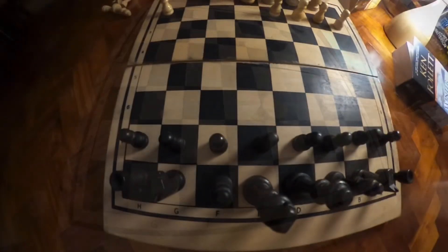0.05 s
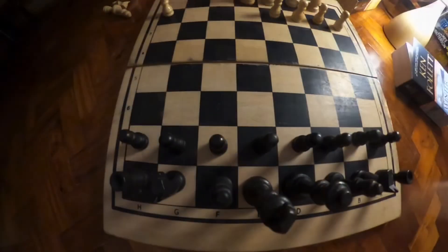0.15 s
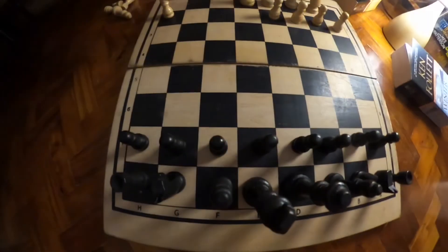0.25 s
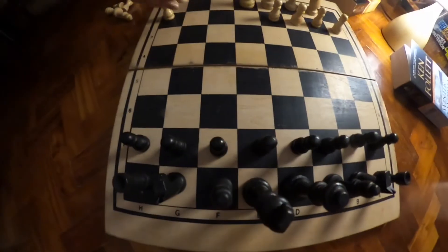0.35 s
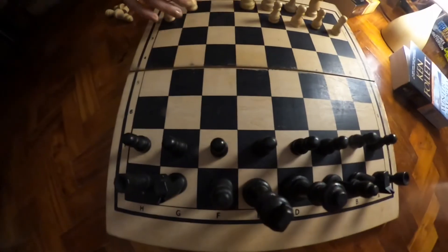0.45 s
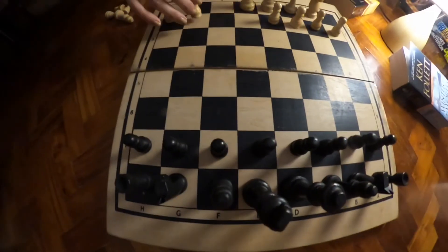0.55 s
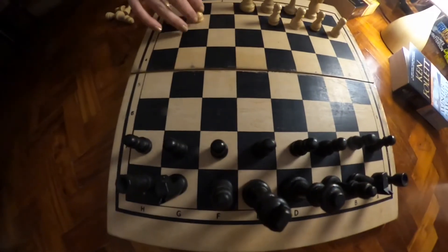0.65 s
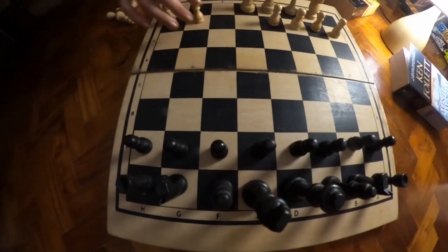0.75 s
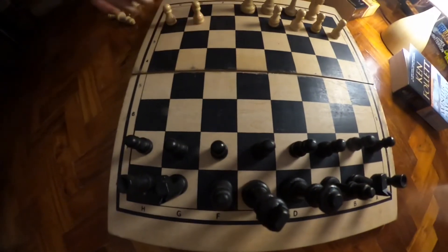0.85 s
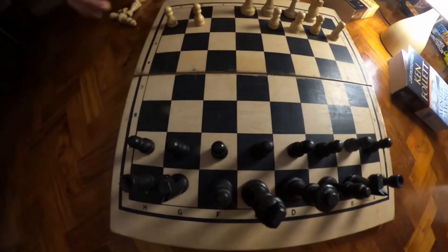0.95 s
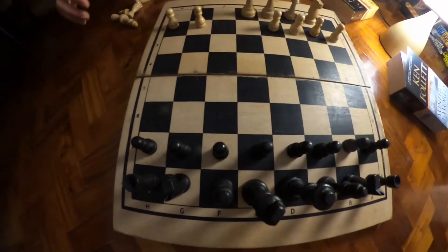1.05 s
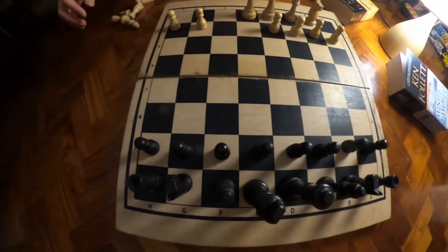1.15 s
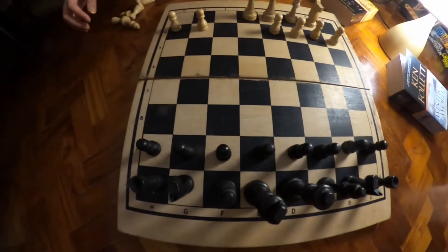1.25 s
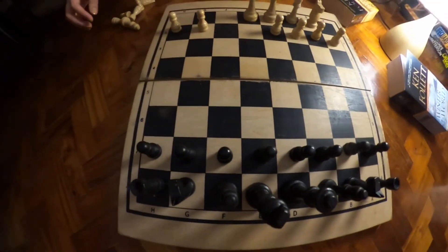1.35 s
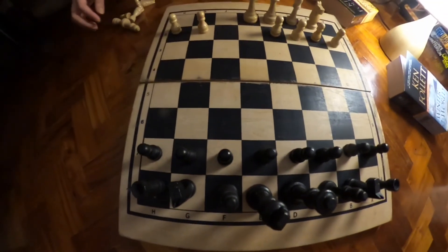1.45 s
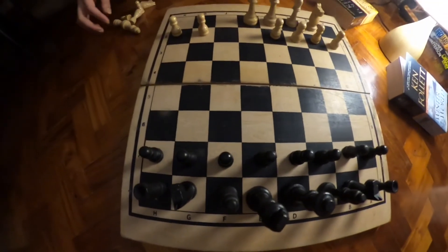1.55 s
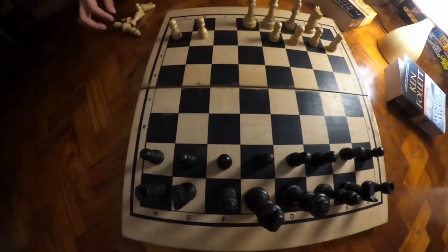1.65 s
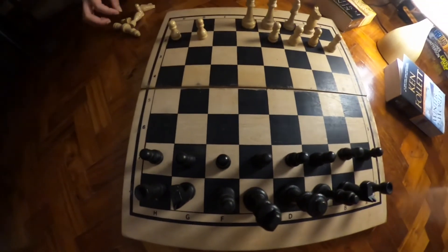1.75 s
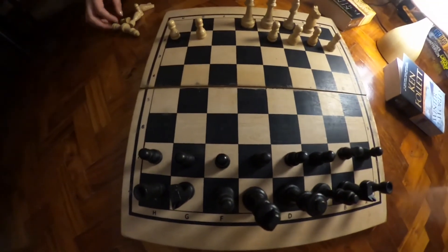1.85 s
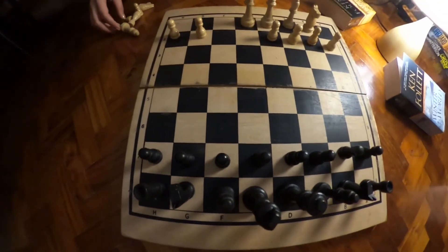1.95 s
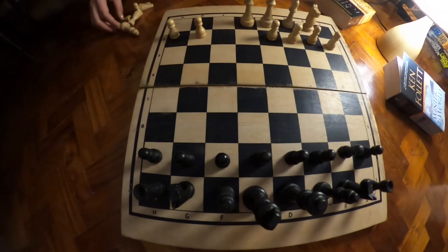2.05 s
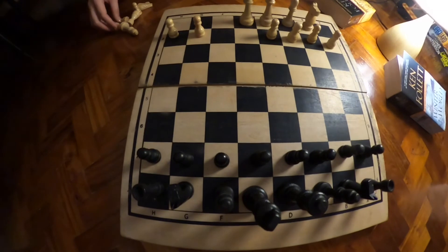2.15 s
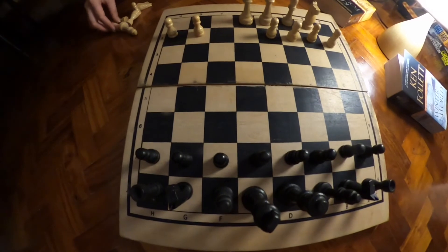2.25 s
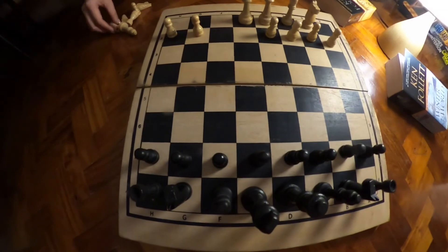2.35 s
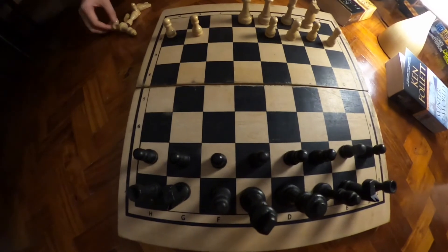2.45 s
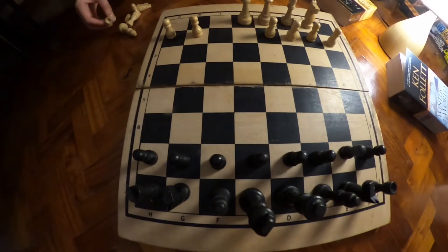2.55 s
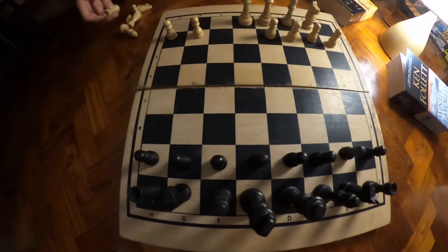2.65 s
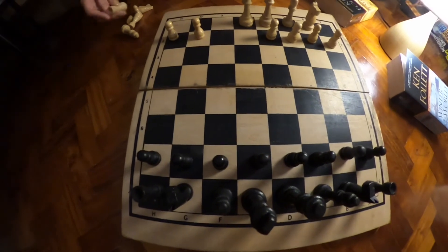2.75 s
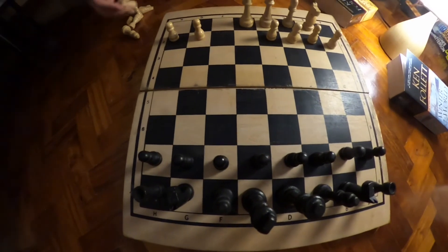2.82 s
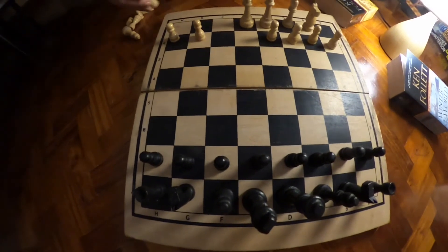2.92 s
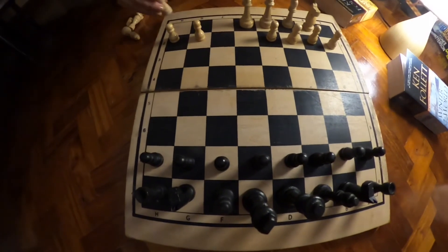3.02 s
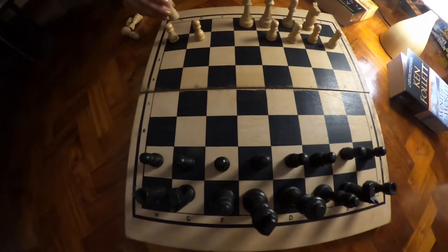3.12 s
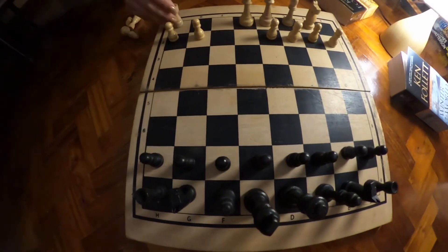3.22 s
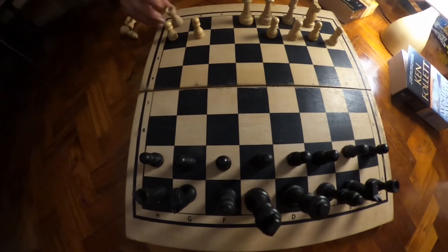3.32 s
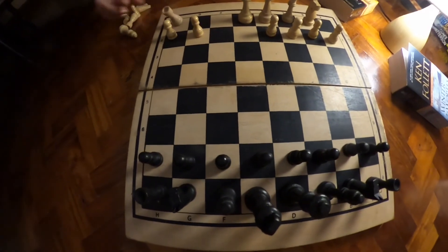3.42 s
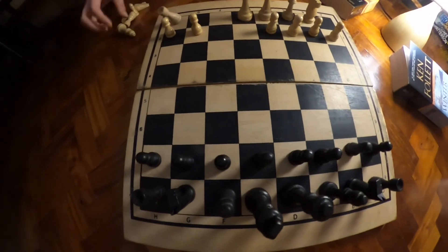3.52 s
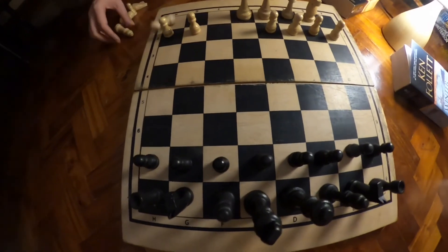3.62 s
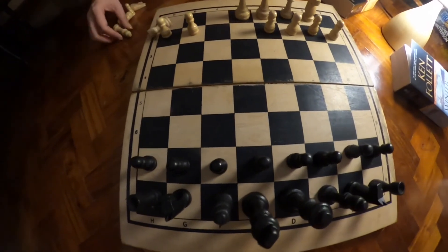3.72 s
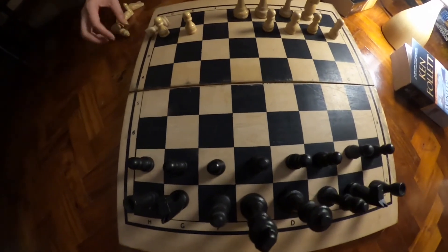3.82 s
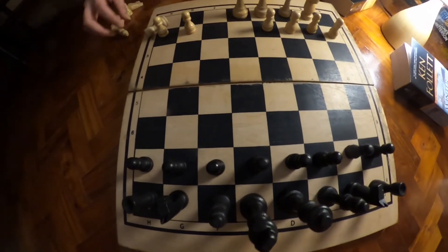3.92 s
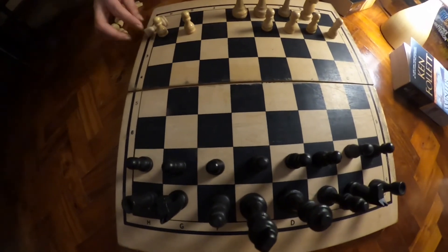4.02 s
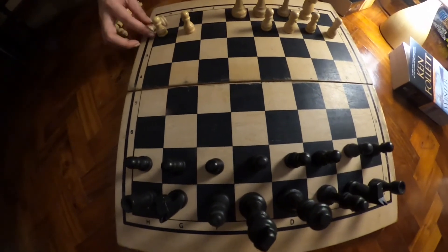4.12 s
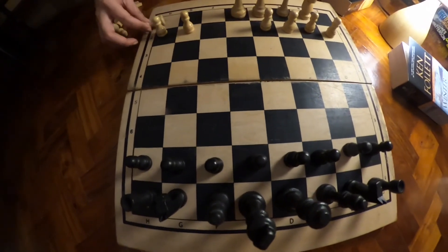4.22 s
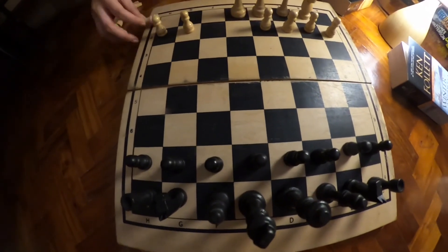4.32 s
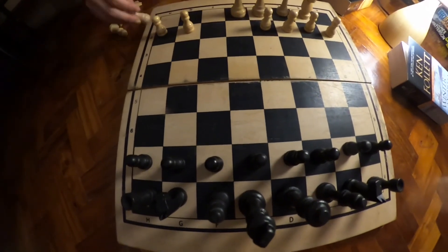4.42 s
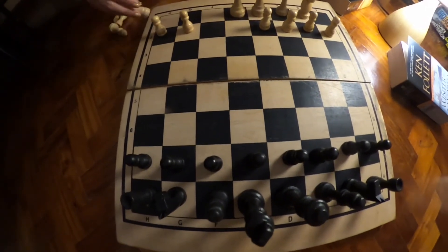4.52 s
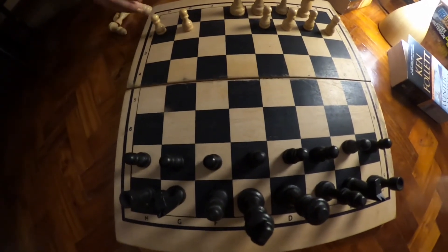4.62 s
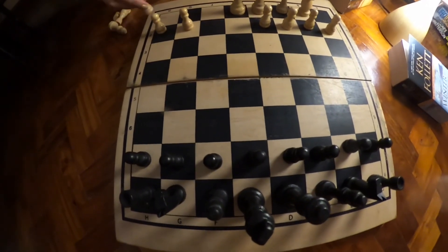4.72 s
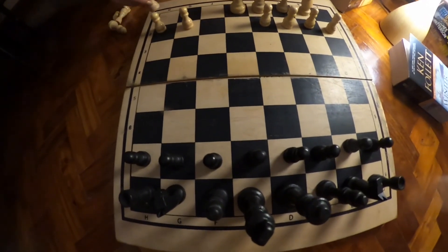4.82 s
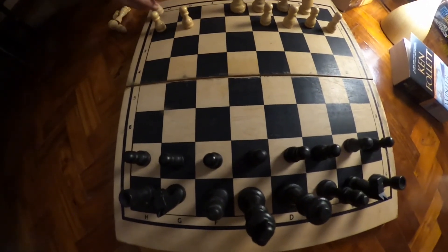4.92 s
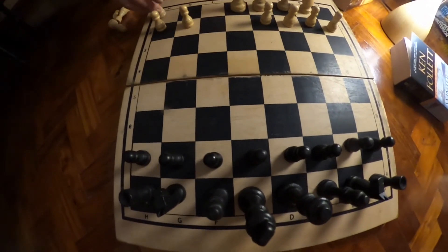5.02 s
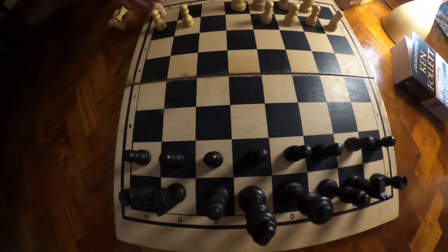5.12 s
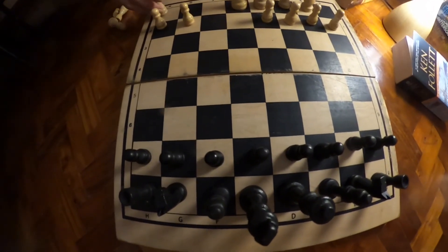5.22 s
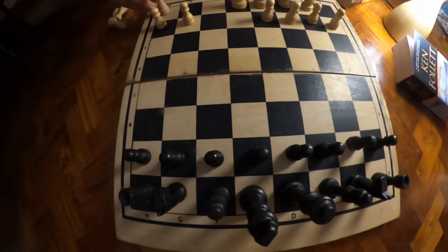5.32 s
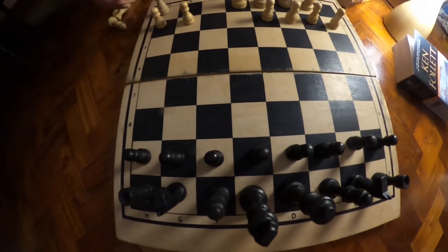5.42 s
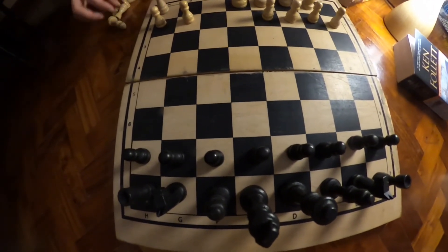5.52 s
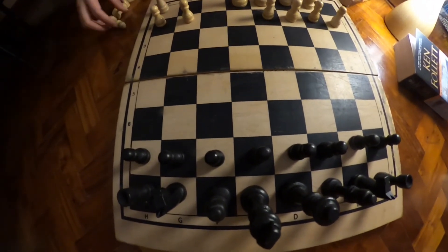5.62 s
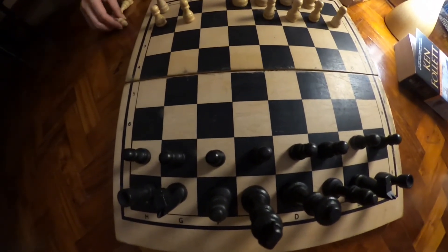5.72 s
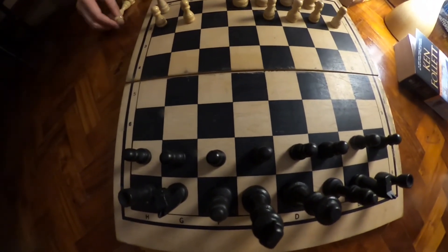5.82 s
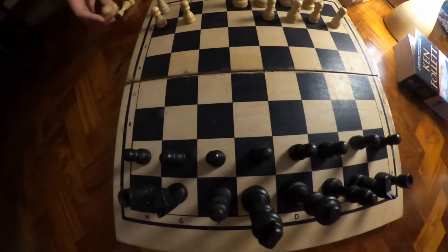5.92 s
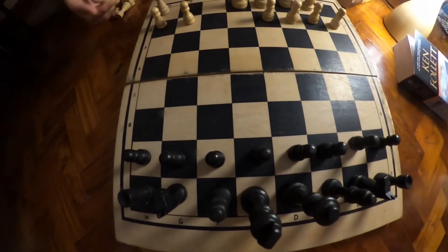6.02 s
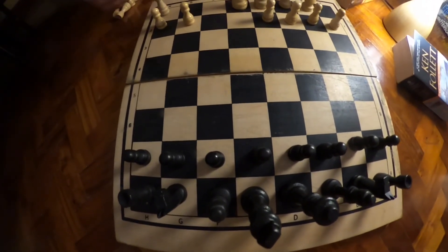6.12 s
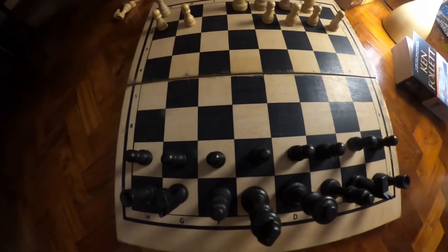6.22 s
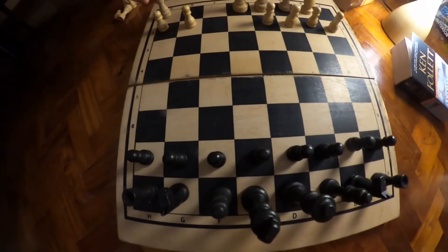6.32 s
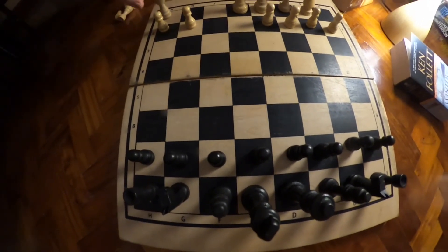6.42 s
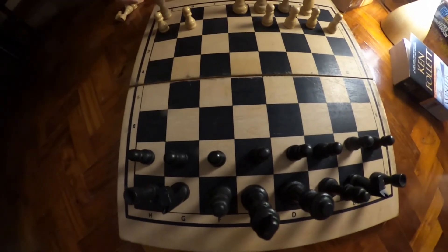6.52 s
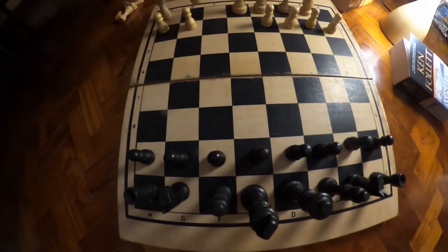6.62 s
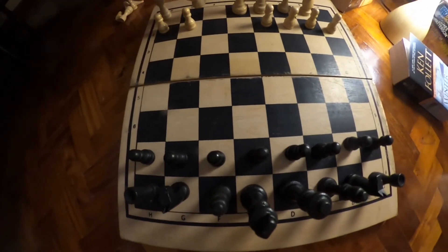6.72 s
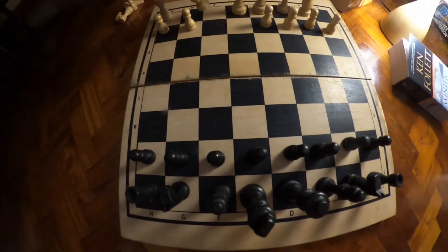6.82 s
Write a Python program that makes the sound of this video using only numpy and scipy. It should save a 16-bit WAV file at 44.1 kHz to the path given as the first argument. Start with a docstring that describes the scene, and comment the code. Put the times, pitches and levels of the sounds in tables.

```python
"""In a small room, microphone close: wooden chess pieces knock on a hollow folding board within the first second.
Fingers then rub spare pieces, which click in the hand; firmer knocks and a loud click follow from 3.2 s.
From 4.1 s pieces rock and slide into place, with more knocks and slides from 5 s; after 5.68 s one rattles to rest.
Wood sounds are taps, noise and damped modes with a diffuse echo; beneath them all lie wavering sine hum lines
and filtered noise, the drone of mains and fan."""
import sys
import numpy as np
from scipy import signal
from scipy.fft import rfft, irfft, next_fast_len
from scipy.io import wavfile

SR = 44100
rng = np.random.default_rng(int(sys.argv[2]) if len(sys.argv) > 2 else 0)


def log_audio(samples):
    """Write samples as a 16-bit WAV file to the path given in sys.argv[1]."""
    # one column per channel
    frames = np.atleast_2d(samples).T
    # limit to full scale, then quantise
    limited = np.clip(frames, -1, 1)
    pcm = np.round(limited * 32767).astype(np.int16)
    wavfile.write(sys.argv[1], SR, pcm)


N = 302526
TIME = np.arange(N) / SR
RING = TIME[:SR // 3]  # time axis of one strike, s


def undb(db):
    """Decibels to gain."""
    return 10 ** (np.asarray(db) / 20)


def unit(x):
    """Scale to rms 1."""
    return x / np.sqrt(np.mean(x ** 2))


def decay(t, t60):
    """Exponential decay that falls 60 dB in t60 seconds."""
    return np.exp(-np.log(1000) * t / t60)


def at(hz, points):
    """Read (Hz, value) points on a log-frequency axis."""
    f, value = np.transpose(points)
    return np.interp(np.log(hz + 1e-6), np.log(f), value)


def over_time(points):
    """Draw a line through (s, value) points over the whole scene."""
    return np.interp(TIME, *np.transpose(points))


def peak_at(f, centre_hz, octaves):
    """Resonance-shaped gain around a centre, at half its height the given octaves away."""
    return 1 / (1 + (np.log2((f + 1) / centre_hz) / octaves) ** 2)


def shape(x, gain):
    """Filter with a gain given as a function of Hz."""
    n = x.shape[-1]
    size = next_fast_len(n, real=True)
    spectrum = rfft(x, size) * gain(np.fft.rfftfreq(size, 1 / SR))
    return irfft(spectrum, size)[..., :n]


def butter(x, hz, kind, order=2):
    """Causal low- or high-pass."""
    return signal.sosfilt(signal.butter(order, hz, kind, fs=SR, output="sos"), x)


def add(track, s, sound):
    """Mix a sound into the track at a time."""
    start = int(s * SR)
    track[start:start + len(sound)] += sound[:N - start]


def swell(s, length, attack_s, release_s):
    """Envelope of a hand movement: it rises, holds until its length is over and dies away."""
    t = TIME - s
    return np.clip(t / attack_s, 0, 1) * np.exp(-np.maximum(t - length, 0) / release_s)


def wander(rate):
    """Smooth chance of spread 1 that changes about rate times a second."""
    return unit(shape(rng.standard_normal(N), lambda f: 1 / (1 + (f / rate) ** 4)))


def even_noise(n, size=512, count=3):
    """Noise with its lumps in time and pitch levelled out, like a dense, well-mixed ring."""
    noise = rng.standard_normal(n)
    for _ in range(count):
        cells = signal.stft(noise, nperseg=size)[2]
        noise = signal.istft(cells / (np.abs(cells) + 1e-12))[1][:n]
    return noise


def fading_noise(t, colour, decays):
    """Countless overlapping modes: coloured noise in which each band dies at its own rate."""
    noise = unit(shape(even_noise(len(t)), colour))
    out = 0
    for hz, t60 in decays:
        share = [(f, float(f == hz)) for f, _ in decays]  # crossfades into the neighbouring bands
        band = shape(noise, lambda f: at(f, share))
        out = out + band * decay(t, t60)
    return out


def ring(modes, weight, scatter_db, lag_rad=1.693):
    """Damped modes; each lags its lower neighbour, and every strike weights them a little differently."""
    hz, db, t60 = np.transpose(modes)
    size = undb(db + scatter_db * rng.standard_normal(len(hz))) * weight(hz)
    lag = lag_rad * np.arange(len(hz))[:, None]
    swing = np.sin(2 * np.pi * np.outer(hz, RING) - lag)
    return size @ (swing * decay(RING, t60[:, None]))


# pieces set down close to the microphone, rim first, then flat; columns: start_s, level_db of the rim contact,
# contact_hz (corner of the rim contact, high is hard), damping_db_per_s (by the pressing hand),
# thump_db (panel boost at the rim contact), pitch_hz (of the thump), rim_spot_hz and base_spot_hz
# (what each spot favours), tilt_s (time until it lies flat), flat_db (flat contact relative to the rim)
SET_DOWNS = [(0.5886, -19, 1420, 205, -3.5, 395.4, 430, 674, 0.0077, -4.5),
             (0.6192, -32, 1000, 192, 1, 405, 704, 1550, 0.0056, 4),
             (3.2130, -18.5, 2580, 113, -4.5, 367, 1300, 335, 0.0063, -6.5),
             (3.625, -20.5, 5160, 127.5, 0, 432.5, 1200, 2000, 0.021, -8.5),
             (3.6734, -24.5, 3400, 5, -5.5, 358, 1150, 620, 0.0048, -5.5),
             (3.6935, -31, 3400, 40, 0.5, 358, 1540, 2020, 0.0042, 0),
             (4.0871, -36.5, 800, 192, 0, 383, 390, 366, 0.00553, -8),
             (4.1155, -34.5, 1690, 93, -8, 390, 1190, 1200, .007, 2),
             (4.1427, -44, 7000, 118, 4, 390, 2100, 1200, 0.011, -16),
             (4.1711, -44.5, 1200, 127, 3, 369, 480, 390, 0.00724, 2.5),
             (4.238, -44.5, 2380, 99, -5, 390, 1200, 754, 0.00274, -4),
             (4.2673, -43.5, 3300, 180, 5, 390, 2100, 1150, 0.018, -2),
             (4.252, -50, 3000, 153, 8, 390, 800, 1150, .003, -8),
             (4.304, -50.5, 3000, 148, -5, 390, 1140, 1140, .008, 1),
             (4.324, -48, 4200, 117, -16, 400, 1140, 1160, .004, -8.5),
             (4.9850, -24.5, 2460, 271.5, -4, 350, 1180, 1245, .007, -4.5),
             (5.2375, -43.5, 1800, 198, -7, 390, 1340, 820, 0.0041, 2),
             (5.2523, -39.5, 1400, 142, -2, 380, 1200, 410, .0075, 1.5),
             (5.287, -54, 1300, 146, -3, 385, 1250, 1250, 0.0043, -5),
             (5.3164, -44, 1600, 197, 4.5, 365, 1270, 694, 0.0026, -7),
             (5.339, -39.5, 443, 149, 3.5, 331, 340, 337, 0.016, -6)]
RIM_SPOT_DB, BASE_SPOT_DB = 6, 13.5  # how strongly a spot favours its modes
FLAT_SOFTER, FLAT_THUMP_DB = 0.63, 0.5  # flat contact: factor on the corner, extra panel boost


def knocks(tap_db=19, crack_db=4, crack_s=0.0055):
    """Pieces land rim first and drop flat: each contact taps and cracks, then the board rings under the hand."""
    out = np.zeros(N)
    for (start_s, level_db, contact_hz, damping, thump_db, pitch_hz,
         rim_spot_hz, base_spot_hz, tilt_s, flat_db) in SET_DOWNS:
        rim_body = clack(rim_spot_hz) + board(thump_db, pitch_hz, rim_spot_hz, RIM_SPOT_DB)
        flat_body = board(thump_db + FLAT_THUMP_DB, pitch_hz, base_spot_hz, BASE_SPOT_DB)
        rim = (start_s, level_db, contact_hz, rim_body)
        flat = (start_s + tilt_s, level_db + flat_db, contact_hz * FLAT_SOFTER, flat_body)
        for start, level, corner, body in (rim, flat):
            tap = undb(tap_db) * (RING == 0)  # a single sample
            noise = unit(shape(rng.standard_normal(len(RING)), lambda f: undb(at(f, GRAIN))))
            crack = undb(crack_db) * noise * np.exp(-RING / crack_s)
            held = body * undb(-damping * RING)
            add(out, start, undb(level) * contact(tap + crack + held, corner))
    return out


def clack(hz, level_db=1.5, t60_s=0.007):
    """The first short swing of the wood right under the rim."""
    return undb(level_db) * np.sin(2 * np.pi * hz * RING) * decay(RING, t60_s)


def contact(x, hz, soft_share=0.66):
    """A softer contact lasts longer and takes away treble; the hard rim lets a little through."""
    soft = butter(x, hz, "low", order=2)
    hard = butter(x, hz, "low", order=1)
    return soft_share * soft + (1 - soft_share) * hard


# modes of the hollow board; columns: pitch_hz, level_db (relative), t60_s
BOARD_MODES = [(203, -7, 0.09), (238, -10.5, .12), (290, -7.5, 0.085), (323, -13, .09), (358, -10.5, .3),
               (386, -9.5, .14), (433, -3, 0.08), (484, -5.5, .14), (583, -11.5, .18), (626, -15, 0.39),
               (712.6, -5.5, 0.13), (776, -9.5, .2), (841.5, -8.5, .25), (992, -9.5, .1),
               (1128, -5.5, 0.12), (1180, -4.5, .04), (1230, -7, .06), (1304, -6, 0.11), (1357, -6, .045),
               (1507, -9, .08), (1613, -3.5, .06), (1812, -14, .05), (2067, -14, .04), (2150, -7.5, .03),
               (2460, -19, .035), (3130, -16.5, .025), (3410, -3.5, .03), (3950, -10.5, .02),
               (4200, -14.5, .025), (5500, -14.5, .02), (6300, -5, .016)]
# colour of the crowd of weaker wood modes; columns: pitch_hz, level_db (relative, per Hz)
GRAIN = [(50, -65), (160, -27), (300, 9.5), (480, 9.5), (800, 1), (920, -1.5), (1200, 4), (1850, 1.5),
         (2150, 5), (2700, 2), (4300, 0), (5050, -6.5), (5600, -2.5), (6800, -4), (9000, -9), (15000, -29)]
# decay of those weaker modes; columns: pitch_hz, t60_s
GRAIN_T60 = [(300, 0.093), (1200, 0.41), (2500, 0.1), (5000, 0.07), (10000, 0.0073)]
PANEL_DB, PANEL_T60_S = 4.5, 0.17  # the panel's main mode


def board(thump_db, panel_hz, spot_hz, spot_db, modes_db=-3.5, grain_db=-1, thump_hz=480, spot_octaves=0.12):
    """One tap's answer: the panel thumps at the pitch of that spot, which also favours its own group of modes."""
    def weight(f):
        thump = thump_db / (1 + (f / thump_hz) ** 4)
        return undb(thump + spot_db * peak_at(f, spot_hz, spot_octaves))
    grain = fading_noise(RING, lambda f: undb(at(f, GRAIN)) * weight(f), GRAIN_T60)
    panel = ring([(panel_hz, PANEL_DB, PANEL_T60_S)], weight, scatter_db=0)
    modes = ring(BOARD_MODES, weight, scatter_db=1)
    return undb(modes_db) * (panel + modes) + undb(grain_db) * grain


# bases dragged over the board; columns: start_s, length_s, level_db, contact_hz (corner),
# thump_db (panel boost), spot_hz (what the spot favours)
DRAGS = [(4.121, 0.023, -36.5, 2800, 4, 2140), (4.16, 0.031, -36.5, 2980, 8, 1180),
         (4.215, 0.033, -39, 2600, 10.5, 780), (4.284, 0.033, -46.5, 2670, -13, 1130),
         (5.092, 0.064, -44, 637, 7, 1000), (5.221, 0.019, -43, 2010, -3, 1360),
         (5.268, 0.035, -38.5, 1400, 9, 1230), (5.327, 0.017, -42, 1600, 7, 1300)]


def slides(slips_per_s=750, spread_db=3.5, grit_db=-7, attack_s=0.004, release_s=0.011):
    """A base sticks and slips in uneven jerks; each slip taps the board and grates on the varnish."""
    out, n = np.zeros(N), len(RING)
    for start_s, length_s, level_db, contact_hz, thump_db, spot_hz in DRAGS:
        strength = undb(spread_db * rng.standard_normal(n).clip(-2, 2))
        slips = unit((rng.random(n) < slips_per_s / SR) * strength)
        drag = slips * swell(0, length_s, attack_s, release_s)[:n]
        force = undb(level_db) * contact(drag, contact_hz, soft_share=0.7)
        body = board(thump_db, 390, spot_hz, spot_db=10.5, spot_octaves=0.055)
        add(out, start_s, signal.fftconvolve(force, body / np.linalg.norm(body)))
        add(out, start_s, undb(grit_db) * butter(force, 1800, "high"))
    return out


# piece against piece; from 5.68 s one is let go and rattles to rest; columns: start_s,
# level_db (peak before the rim's ring is added), pitch_hz (strongest), rim_db (ring of the rim)
TICKS = [(1.9030, -33.5, 6460, -16), (1.9175, -41, 6200, -20), (2.0828, -47, 5500, -33),
         (2.2867, -43, 3400, -27), (2.439, -39.5, 3550, -29), (3.2134, -20.5, 7270, -35),
         (3.6102, -37, 4700, -27), (3.6163, -29.5, 2590, -22.5), (3.6262, -8, 6540, -29.5),
         (3.6738, -24.5, 7000, -18), (4.142, -36.5, 7100, -15), (4.252, -51, 4200, -29),
         (4.283, -44, 3760, -29), (4.364, -39.5, 5500, -12), (5.656, -39, 2400, -20),
         (5.6692, -34, 3320, -22), (5.6785, -18.5, 7200, -12), (5.708, -28.5, 6100, -6),
         (5.738, -38, 6000, -5), (5.762, -42, 5500, 3), (5.787, -50, 5500, -2), (5.8021, -40, 3800, 3)]
# modes of a small turned piece; columns: pitch_hz, level_db (relative), t60_s
PIECE_MODES = [(1750, 3.5, .007), (2330, 10, .007), (2710, 10.5, .007), (3400, 9.5, .005), (4630, -2, .005),
               (5760, -2.5, .005), (6680, 2.5, .007), (7700, -9, 0.013)]
# thin ring of its hard rim; columns: pitch_hz, level_db (relative), t60_s
RIM_MODES = [(11200, -1, 0.042), (12800, 0.5, 0.02)]


def clicks(snap_db=7, snap_s=0.0011, spread_octaves=0.76, contact_hz=9200):
    """Loose pieces tap each other: a snap, a few short modes and the thin ring of the rim."""
    out = np.zeros(N)
    for start_s, level_db, pitch_hz, rim_db in TICKS:
        def weight(f):
            return peak_at(f, pitch_hz, spread_octaves)
        noise = shape(rng.standard_normal(len(RING)), weight)
        snap = unit(butter(noise, 1100, "high", order=1)) * np.exp(-RING / snap_s)
        modes = ring(PIECE_MODES, weight, scatter_db=1.5)
        click = butter(modes + undb(snap_db) * snap, contact_hz, "low", order=3)
        rim = undb(rim_db) * ring(RIM_MODES, np.ones_like, scatter_db=4.5)
        add(out, start_s, undb(level_db) * (click + rim) / np.abs(click).max())
    return out


# piece grazes piece; columns: start_s, length_s, level_db, attack_s (time to build up)
SCUFFS = [(1.885, 0.053, -68, .002), (4.106, 0.026, -51.5, 0.0048), (4.143, 0.095, -67.5, .01),
          (4.286, 0.029, -65, .025), (4.32, .0045, -61, 0.0033), (4.361, 0.0043, -49, .003)]


def scuffs(centre_hz=5600, spread_octaves=1.0, release_s=0.0036):
    """Varnish grazes varnish: a short rasp around the small pieces' high modes."""
    rasp = unit(shape(rng.standard_normal(N), lambda f: peak_at(f, centre_hz, spread_octaves)))
    pressure = 0
    for start_s, length_s, level_db, attack_s in SCUFFS:
        pressure = pressure + undb(level_db) * swell(start_s, length_s, attack_s, release_s)
    return rasp * pressure


# fingers rub over the loose pieces; columns: start_s, length_s, level_db (before the patchiness)
RUBS = [(1.702, 1.3, -84), (5.404, 1.2, -94)]


def fingers(low_hz=2200, high_hz=8500, patchy_db=5, attack_s=1, release_s=0.3):
    """Skin brushing varnish: a faint hiss that comes and goes."""
    hiss = butter(butter(rng.standard_normal(N), low_hz, "high"), high_hz, "low")
    pressure = 0
    for start_s, length_s, level_db in RUBS:
        pressure = pressure + undb(level_db) * swell(start_s, length_s, attack_s, release_s)
    return unit(hiss) * pressure * undb(patchy_db * wander(12))


# colour of the small room's echo; columns: pitch_hz, level_db (relative)
ROOM_COLOUR = [(150, -1.5), (400, 4), (750, -1), (920, -8.5), (1400, -5), (3000, 0.5), (5000, -1),
               (7000, -7.5), (13000, 5.5)]
# decay of the echo; columns: pitch_hz, t60_s
ROOM_T60 = [(200, 0.26), (1000, 0.37), (4000, 0.32), (12000, 0.31)]


def room(x, first_s=0.0039, build_s=0.03, side_db=-7):
    """Walls answer after a moment with a short diffuse tail; gives mid and side."""
    t = TIME[:SR * 3 // 5]
    onset = 1 - np.exp(-np.maximum(t - first_s, 0) / build_s)
    echoes = []
    for _ in range(2):
        tail = onset * fading_noise(t, lambda f: undb(at(f, ROOM_COLOUR)), ROOM_T60)
        echoes.append(signal.fftconvolve(x, tail / np.linalg.norm(tail))[:N])
    mid, side = echoes
    return np.array([mid, undb(side_db) * side])


# hum lines of mains and fan; columns: pitch_hz, width_hz (sets how far and fast the pitch wavers),
# level_db (relative to the drone level)
HUM_LINES = [(52.5, 7.7, -12.5), (87.2, 5.8, -13.5), (121.4, 3.53, -4), (161.6, 4.1, -9), (205, 6.58, -6.5),
             (235, 5.94, -12.5), (386, 6.44, -18.5), (436, 16.6, -19.5), (595, 27.4, -26.5), (810, 5, -20)]
# drone under the whole scene; columns: time_s, level_db (added to each line's own)
DRONE_LEVEL = [(0, -47.5), (1.2, -47.5), (3, -45), (4.8, -46.5), (6.4, -43.5), (6.86, -45)]


def drone(waver=0.59, drift=0.421, steady_hz=500):
    """Hum lines that waver in strength and pitch, the wider ones more quickly; high lines vary least in strength."""
    out = 0
    for pitch_hz, width_hz, level_db in HUM_LINES:
        drifting_hz = pitch_hz + drift * width_hz * wander(width_hz)
        phase = 2 * np.pi * np.cumsum(drifting_hz) / SR
        strength = 1 + waver / (1 + (pitch_hz / steady_hz) ** 2) * wander(width_hz + 3)
        out = out + undb(level_db) * unit(strength * np.sin(phase))
    return undb(over_time(DRONE_LEVEL)) * out


# colour of the fan's air; columns: pitch_hz, level_db (per Hz, before the rush level)
AIR_COLOUR = [(22, -87.5), (60, -88.5), (100, -72), (150, -66), (225, -72), (290, -80), (540, -84.5),
              (680, -84), (900, -90), (1300, -85), (2100, -94), (3600, -102), (4200, -106.5), (5600, -108),
              (7400, -114), (15000, -128)]
# level of the background rush, rising slowly through the scene; columns: time_s, level_db (added to the colour)
RUSH_LEVEL = [(0, -5), (2.4, -1.62), (6.86, -0.5)]


def air(side_db=-7, gust_db=3, gust_hz=110):
    """Diffuse background rush of air, smooth above and rumbling unevenly below; gives mid and side."""
    white = rng.standard_normal((2, N)) * np.sqrt(SR / 2)
    rush = shape(white, lambda f: undb(at(f, AIR_COLOUR)))
    rumble = shape(rush, lambda f: 1 / (1 + (f / gust_hz) ** 4))
    gusts = undb(gust_db * wander(3.9)) - 1
    mid, side = (rush + rumble * gusts) * undb(over_time(RUSH_LEVEL))
    return np.array([mid, undb(side_db) * side])


# stereo width of the direct sound: nearly central at first, wider and leaning left from 3 s;
# columns: time_s, level_db (quarter-cycle-early part of the side signal, relative to the direct sound)
DIRECT_WIDTH = [(.7, -29), (3, -17), (5.8, -16)]


def scene(board_room_db=-10.0, click_room_db=-7, louder_left=0.4, radiate_hz=170):
    """Board and pieces leaning slightly to the left, their echo, and the drone of the room."""
    wood = butter(knocks() + slides(), radiate_hz, "high", order=3)  # a small panel radiates little bass
    ticks = clicks() + scuffs() + fingers()
    direct = wood + ticks
    # the left channel is a little earlier (1j) and louder
    side = undb(over_time(DIRECT_WIDTH)) * shape(direct, lambda f: louder_left + 1j)
    echo = room(undb(board_room_db) * wood + undb(click_room_db) * ticks)
    mid, side = np.array([direct + drone(), side]) + echo + air()
    return np.array([mid + side, mid - side])


# treble loss of the microphone; columns: pitch_hz, level_db
MIC_RESPONSE = [(7300, 0.5), (8300, -5), (9500, -13), (13000, -17.5), (15400, -29.5)]
TOP_HZ = 15400  # nothing much passes above


def record(dry, mono_hz=1150, leak_db=-44, rumble_db=3, rumble_hz=55):
    """The stereo image is nearly mono below mono_hz, save the deepest rumble; treble is dulled and the top cut."""
    def width(f):
        rumble = undb(rumble_db) / (1 + (f / rumble_hz) ** 2)  # the deepest range stays wide
        return undb(leak_db) + rumble + 1 - 1 / (1 + (f / mono_hz) ** 12)
    dry = dry * np.minimum(1, np.minimum(TIME, TIME[::-1]) / 0.003)  # short fades at both ends
    mid = (dry[0] + dry[1]) / 2
    side = shape((dry[0] - dry[1]) / 2, width)
    sound = shape(np.array([mid + side, mid - side]), lambda f: undb(at(f, MIC_RESPONSE)))
    return signal.sosfilt(signal.ellip(8, 0.2, 70, TOP_HZ, fs=SR, output="sos"), sound)


dry = scene()
out = record(dry)
log_audio(out)
```